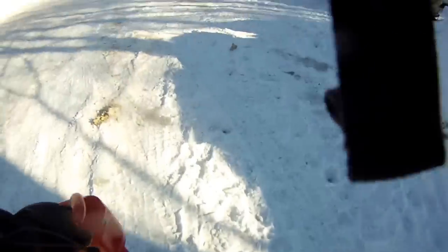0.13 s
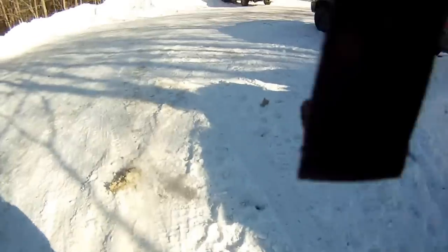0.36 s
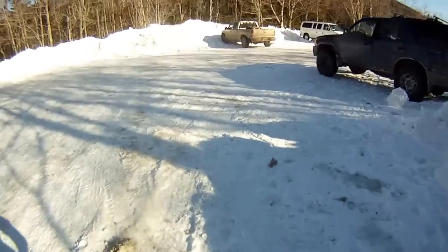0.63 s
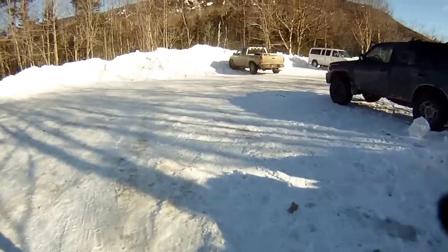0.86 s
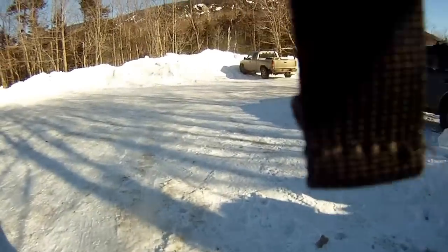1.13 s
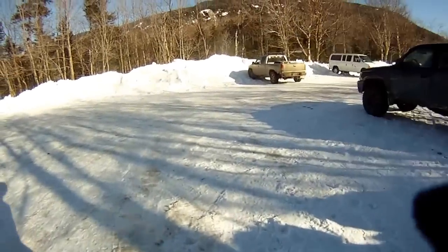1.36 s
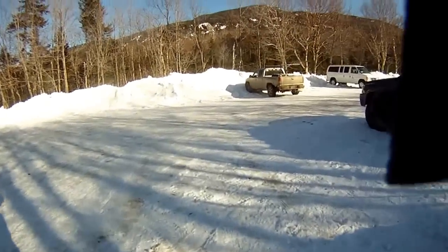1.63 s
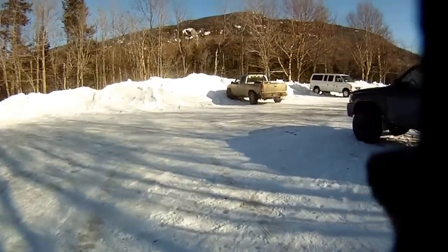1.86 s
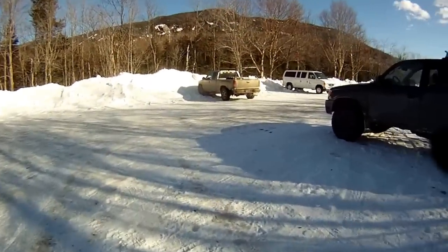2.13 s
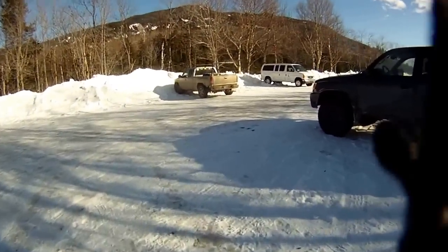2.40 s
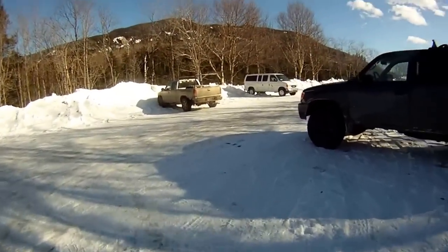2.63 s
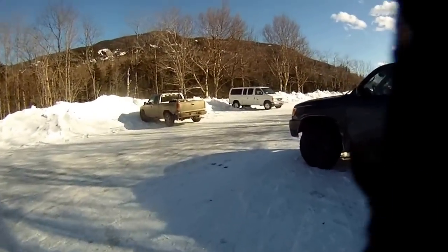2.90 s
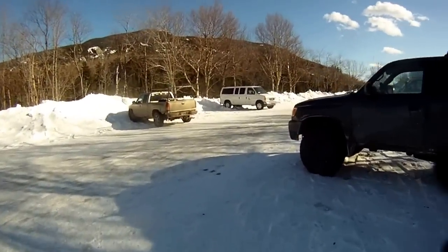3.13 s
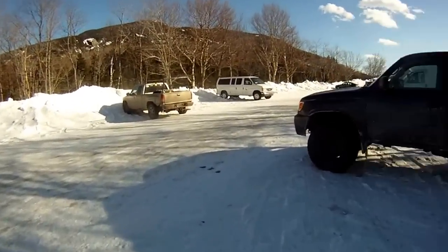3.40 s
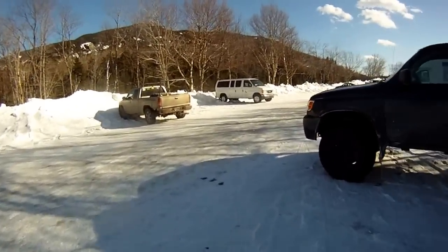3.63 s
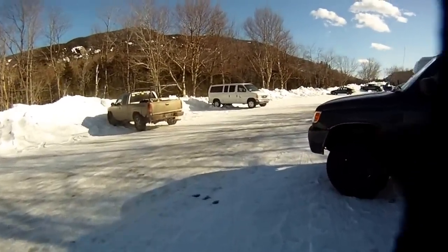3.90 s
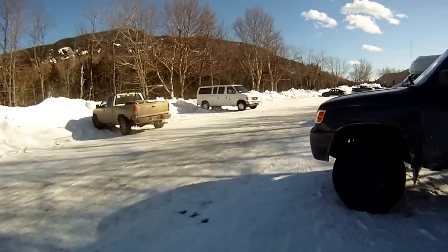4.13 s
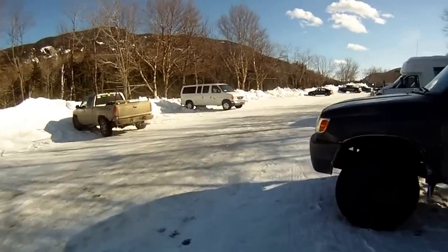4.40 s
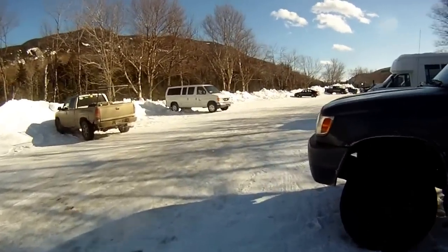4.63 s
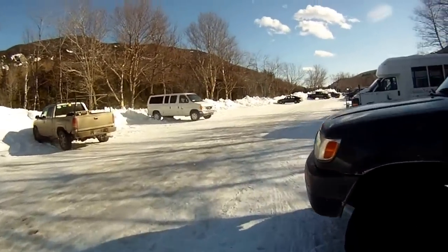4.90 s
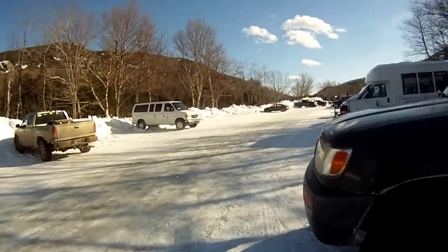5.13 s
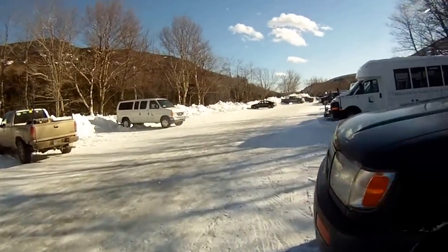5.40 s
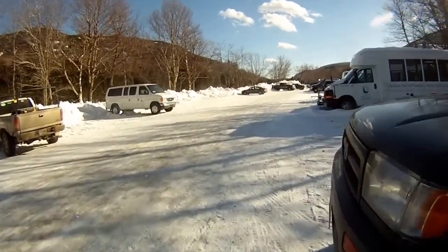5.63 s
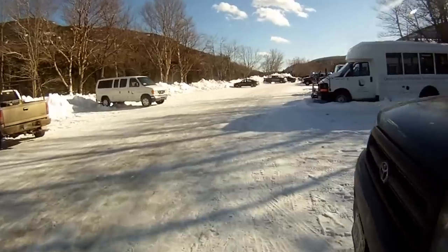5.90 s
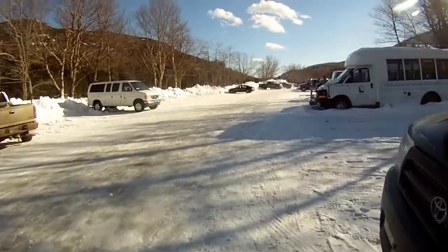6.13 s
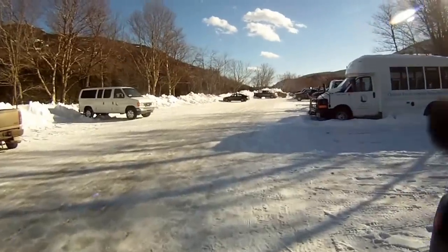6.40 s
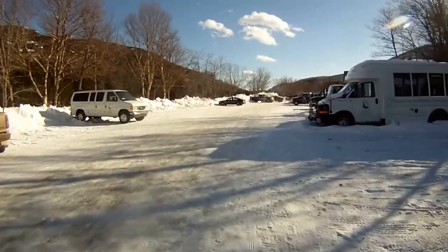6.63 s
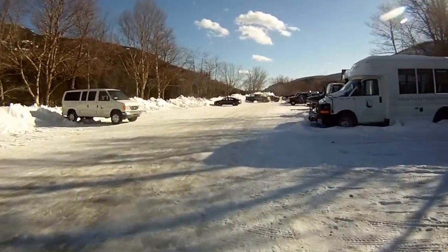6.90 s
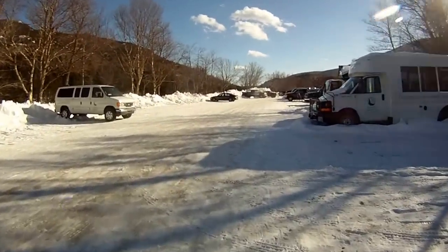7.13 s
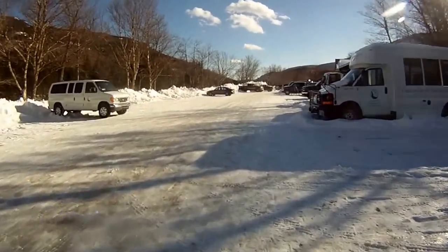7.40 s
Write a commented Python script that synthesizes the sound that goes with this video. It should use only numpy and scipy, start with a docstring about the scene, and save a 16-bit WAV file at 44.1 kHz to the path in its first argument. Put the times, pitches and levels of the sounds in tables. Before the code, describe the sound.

From 0 to 0.75 seconds, muffled boots crunch and drag over packed icy snow, with a nasal rubbing hum on a sealed plastic camera case and a soft low gust. Around 0.8 to 1.2 light thuds and dry ticks begin, with a stronger crunch at 1.0. A short rattle at 1.3 leads to a deep thump at 1.43, then a very loud hollow clack at 1.82. From 2 seconds knocks come thick and uneven, many with a tiny bounce, mixed with brief gritty mount rattles. Strong clacks stand out near 2.2, 3.1, 3.25, 3.87, 5.2 and 6.26; the 5.2 cluster is especially sharp. Crunching steps swell between and under them, notably at 3.5, 5.1, 5.6 and 7.3. Low wind heaves come and go, strongest near 1.6 to 2.1 and 4.3. Faint hiss and coarse, metallic treble persist until the cut at 7.5, without echo.

```python
"""Someone walks over packed icy snow with a small camera in a closed plastic housing.
From the start boots crunch (clumped, filtered clicks), the shell hums with rubbing, and gusts heave (slow noise).
From 0.8 s knocks ring the shell (damped sines, noise snaps); from 1.3 s the mount rattles and grinds in short runs.
Knocks, rattles, steps and gusts go on to the end at 7.5 s, over faint hiss.
Throughout, the sound is sampled at a low rate and each sample held, which mirrors the spectrum into the treble."""
import sys
import numpy as np
from scipy import signal
from scipy.fft import rfft, irfft, next_fast_len
from scipy.io import wavfile
from scipy.ndimage import uniform_filter1d

SR = 44100
rng = np.random.default_rng(int(sys.argv[2]) if len(sys.argv) > 2 else 0)


def voltage_ratio(level):
    """Linear amplitude factor for a level in decibels (scalar or array-like)."""
    return 10 ** (np.asarray(level, float) / 20)


def store_wav(level_fs):
    """Save 16-bit WAV to argv[1]."""
    pcm = np.round(np.clip(np.atleast_2d(level_fs), -1, 1) * 32767)
    wavfile.write(sys.argv[1], SR, pcm.T.astype(np.int16))


N = 331543

# Single knocks on the shell. Each row: time in seconds, then thud, body and sharp drive in dB.
KNOCKS = [(0.7766, -14.5, -22, -29.5), (0.8897, -22, -31.5, -37), (0.935, -28.5, -44, -56),
          (0.955, -52, -45, -27), (1.048, -55, -34, -31.5), (1.1457, -57, -40.5, -22.5),
          (1.43, -4.5, -21, -29.5), (1.4358, -40, -30, -18.5), (1.4524, -22, -27, -31),
          (1.5422, -32, -28, -22.5), (1.5764, -44, -40, -24), (1.596, -58, -42, -22.5),
          (1.691, -49, -42, -21.5), (1.8197, -20, 1, -6.5), (1.9138, -25, -15, -30.5),
          (2.045, -25, -44, -22), (2.056, -31, -11.5, -30), (2.0696, -15, -15, -33),
          (2.0745, -41, -21, -14.5), (2.1151, -51, -52, -25), (2.1842, -19.5, -5.5, -18.5),
          (2.2411, -29, -22.5, -34), (2.25, -36, -15, -24), (2.273, -48, -39, -21.5),
          (2.5237, -30, -11.5, -15.5), (2.634, -21, -21.5, -34.5), (2.788, -39, -60, -22),
          (2.7989, -11.5, -21, -10.5), (2.8906, -14.5, -18, -34), (2.9033, -17.5, -40, -27),
          (3.0655, -28, -4.5, -22), (3.0745, -17, -17, -23), (3.0854, -17, -53, -18),
          (3.0957, -18, -12, -33), (3.1246, -23, -20, -18), (3.2385, -17, -5.5, -17),
          (3.273, -35, -22.5, -27.5), (3.3588, -61, -44, -19.5), (3.5811, -13, -10, -22),
          (3.5858, -18, -21.5, -42), (3.6234, -26.5, -38, -38), (3.7735, -35, -41, -23),
          (3.8687, -15, -1.5, -22), (3.875, -14, -14, -35), (3.88, -24, -17, -26), (3.9088, -36, -27, -42),
          (4.084, -39, -11.5, -26.5), (4.1371, -21, -19.5, -44), (4.1457, -23, -18.5, -29),
          (4.2866, -38, -39, -19.5), (4.362, -33, -9.5, -28), (4.3673, -21, -16.5, -25),
          (4.4022, -56, -46, -28), (4.4917, -24, -26, -31), (4.507, -24.5, -36, -37),
          (4.7853, -29.5, -40, -28), (4.827, -54, -37.5, -29.5), (4.9214, -15.5, -41, -15),
          (4.9849, -35, -11.5, -16), (5.018, -24, -30, -24.5), (5.2202, -14, -1.5, -19),
          (5.2252, -21, -11.5, -6.5), (5.243, -26, -20.5, -19), (5.268, -21, -14.5, -42),
          (5.2854, -15.5, -30, -33), (5.3774, -15.5, -24.5, -22), (5.389, -29, -19.5, -32),
          (5.4452, -29, -8.5, -13.5), (5.4491, -21, -38, -28), (5.4931, -56, -46, -21),
          (5.5642, -21, -43, -21), (5.569, -18, -28, -22), (5.722, -44.5, -24, -25.5),
          (5.7412, -21, -12.5, -17), (5.8693, -27, -19, -40.5), (5.898, -49, -48, -25),
          (5.9546, -25, -40, -28.5), (5.969, -37, -54, -27), (6.0168, -39, -40, -28.5),
          (6.086, -16.5, -26, -25), (6.1067, -37, -36, -23), (6.2597, -20, -6.5, -18),
          (6.4906, -23, -19, -29), (6.5687, -44, -16.5, -25), (6.5936, -57, -51, -23),
          (6.7994, -12.5, -10, -27), (6.8322, -44, -24, -24), (6.94, -23.5, -14.5, -29),
          (7.033, -62, -57, -25), (7.0858, -19, -38, -35), (7.137, -55, -40, -20.5),
          (7.1504, -23, -16.5, -36.5), (7.3983, -27, -25.5, -35)]
# Shell modes: a broad push moves the low ones, a hard edge the high ones.
# Each row: frequency in Hz, level against the drive in dB, t60 in seconds.
THUD_MODES = [(133.4, -12.5, 0.018), (253, -6, 0.0081), (422, -8, 0.0094), (695, 0.5, 0.0041)]
BODY_MODES = [(908, -9, 0.0081), (1202, -2.5, 0.011), (1671, -6, 0.012)]
SHARP_MODES = [(2100, 1, 0.019), (3551, -5, 0.02), (4040, -24, 0.0046), (4660, -22, 0.028)]
# Spectrum of snaps, chatter and scraping. Each row: frequency in Hz, relative density in dB per Hz.
SNAP_COLOUR = [(900, -63), (1400, -16), (1750, 6), (2200, 11), (2900, -2.5), (3800, 1), (5900, -12.5)]
# Camera shaking in its mount, a run of small blows.
# Each row: start in seconds, length in seconds, then thud, body and sharp drive in dB.
RATTLES = [(1.277, .07, -63, -48, -43), (1.994, .045, -29.5, -33, -31), (2.268, .045, -30.5, -36.5, -39),
           (2.59, .085, -32.5, -45, -35), (3.104, .055, -27, -53, -29.5), (4.089, .04, -19.5, -26.5, -41),
           (4.155, 0.13, -39, -54, -32.5), (4.618, .06, -26.5, -27, -34), (4.99, .015, -22.5, -30, -32),
           (5.31, .05, -45, -50, -30), (5.252, .06, -24.5, -39, -24), (5.702, .012, -25, -48, -38),
           (5.754, 0.038, -22.5, -23, -28.5), (5.855, .02, -25, -42, -32), (6.268, .1, -26.5, -49, -30),
           (6.466, .02, -25, -34.5, -36), (6.819, .045, -27, -29, -35), (6.933, .075, -32, -34, -29.5),
           (7.052, .03, -60, -56, -33), (7.32, .02, -34, -38, -51), (7.41, .015, -45, -33, -31)]
# Boots pressing and dragging through the crust. Each row: loudest time in seconds, swell in seconds,
# fade in seconds, snow crunch in dB, rubbing on the shell in dB.
SCUFFS = [(.1, .15, 0.14, -50, -52.5), (.36, 0.2, 0.3, -47, -49.5), (.56, 0.014, 0.024, -49, -48.5),
          (.78, 0.16, 0.036, -47.5, -66), (1.0, 0.16, 0.05, -40, -48), (1.3, 0.16, 0.13, -48.5, -60),
          (1.41, 0.06, 0.17, -56, -48.5), (1.55, 0.066, 0.088, -42.5, -49), (1.88, 0.15, .2, -43.5, -48),
          (2.1, 0.18, 0.065, -47.5, -47.5), (2.27, 0.036, 0.06, -52, -54), (2.38, 0.06, 0.099, -46.5, -51),
          (2.62, 0.14, 0.14, -48, -53), (3.0, 0.081, 0.085, -51.5, -50), (3.14, 0.013, 0.054, -42, -55),
          (3.25, 0.044, 0.063, -51.5, -49.5), (3.38, 0.021, 0.064, -55, -62),
          (3.471, 0.038, 0.055, -40.5, -54), (3.75, 0.11, 0.078, -41.5, -46), (4.0, 0.12, 0.22, -51, -53.5),
          (4.22, 0.16, 0.18, -48, -52.5), (4.55, 0.067, 0.07, -46, -53), (4.809, 0.08, 0.042, -47.5, -48.5),
          (4.97, 0.1, 0.18, -53, -54), (5.121, 0.041, 0.062, -40, -45.5), (5.32, 0.048, 0.11, -40, -47),
          (5.63, .11, 0.14, -40.5, -47), (5.88, 0.043, 0.035, -43.5, -48.5),
          (6.08, 0.15, 0.094, -51.5, -58), (6.2, 0.044, .08, -53, -53.5), (6.41, 0.15, 0.068, -47, -49.5),
          (6.56, .03, 0.037, -58, -58), (6.7, 0.047, 0.064, -44, -53.5), (6.97, .05, 0.048, -47, -53),
          (7.1, 0.061, 0.12, -54, -63), (7.279, 0.068, 0.084, -40, -49), (7.52, 0.066, 0.028, -46, -44.5)]
# Muffled snow spectrum. Each row: frequency in Hz, relative density in dB per Hz.
CRUNCH_COLOUR = [(180, -4), (300, -4), (441, -30), (488, -61), (588, -12.5), (956, -5), (1230, -4),
                 (1440, -2.5), (2290, 7.5), (2900, -3.5), (3700, -8.5), (4200, -17), (5900, -26),
                 (7670, -71), (13000, -120)]
# Shell hum under rubbing. Each row: frequency in Hz, width in Hz, relative level in dB.
RUB_MODES = [(1304, 89, -2.5), (780, 180, -17), (3460, 120, -14.5)]
# Gusts pressing on the shell. Each row: strongest time in seconds, heave level in dB.
GUSTS = [(.33, -47), (.8, -50.5), (1.04, -49.5), (1.63, -39.5), (2.12, -39), (2.62, -44.5), (3.17, -49),
         (3.49, -49), (3.92, -41.5), (4.29, -39), (4.83, -43.5), (5.36, -43.5), (5.78, -45.5), (6.55, -56),
         (6.98, -43), (7.15, -46), (7.5, -40.5)]
# Spectrum of the wind flutter. Each row: frequency in Hz, gain in dB.
WIND_COLOUR = [(35, -4.5), (60, 0), (141, -3), (172, -4), (450, -26), (580, -20), (990, -120)]

BOUNCE_S, BOUNCE_DB = 0.0055, (-8.5, -13, -26.5)  # typical delay; thud, body, sharp against the knock
RATTLE_GAP_S, RATTLE_UNEVEN, RATTLE_SCATTER_DB = 0.013, 0.35, 4  # typical gap, its log spread, drive spread
SCRAPE_DB, SCRAPE_FADE_S = -21.5, 0.015  # dB against the sharp column of a rattle
QUIET_CRUNCH_DB, QUIET_RUB_DB = -58, -61  # between the steps
GUST_SWELL_S, GUST_FADE_S, CALM_DB = 0.088, 0.078, -58
FLUTTER_DB, HISS_DB = -56.5, -65.5  # rms
HELD_RATE_HZ, PLAY_RATE_HZ, TOP_HZ = 12000, 48000, 15250


def level(x, db):
    """Scale to an rms level."""
    return x * voltage_ratio(db) / np.sqrt(np.mean(x ** 2))


def colour(x, points):
    """Shape a spectrum by (Hz, dB) points, straight lines over log frequency."""
    hz, db = np.transpose(points)
    size = next_fast_len(N)
    bins_hz = np.maximum(np.arange(size // 2 + 1) * SR / size, 1)
    gain = voltage_ratio(np.interp(np.log(bins_hz), np.log(hz), db))
    return irfft(rfft(x, size) * gain, size)[:N]


def ring(x, hz, t60_s):
    """One damped mode; a unit blow starts a sine of size one."""
    pole = np.exp(2j * np.pi * hz / SR - np.log(1000) / (t60_s * SR))
    return signal.lfilter([1], [1, -pole], x).imag


def walk(rate_hz):
    """Random levels held 1 / rate_hz seconds and slewed twice; spread one."""
    hold = int(SR / rate_hz)
    steps = np.repeat(rng.standard_normal(N // hold + 1), hold)
    x = uniform_filter1d(uniform_filter1d(steps, hold), hold)[:N]
    return x / x.std()


def grains(per_s, spread_db):
    """Random clicks, many small and a few large."""
    hit = rng.random(N) < per_s / SR
    size_db = spread_db * rng.exponential(size=N)
    return hit * rng.standard_normal(N) * voltage_ratio(size_db)


def swells(at_s, swell_s, fade_s, peak_db, quiet_db):
    """Level in dB of bell-shaped swells over a quiet bed, added as power."""
    coarse = np.arange(0, N, 64)
    late_s = coarse / SR - at_s[:, None]
    width_s = np.where(late_s.T < 0, swell_s, fade_s).T
    bells = np.exp(-2 * (late_s / width_s) ** 2)
    power = voltage_ratio(2 * peak_db) @ bells + voltage_ratio(2 * quiet_db)
    return np.interp(np.arange(N), coarse, 10 * np.log10(power))


def knocks(scatter_db=3.0, contact_turns=0.26, snap_db=-5.5, snap_s=0.0019, chatter_db=-26.0, chatter_s=0.011):
    """Every blow pushes the shell inward and rings all modes, each spot a little differently."""
    at_s, thud_db, body_db, sharp_db = blows().T
    spot = rng.standard_normal((len(at_s), 2, 11))  # blow, (level, detune), mode
    t = np.arange(2048) / SR
    # the high modes need a solid blow; a light sharp touch is only a dry snap
    ring_db = np.minimum(sharp_db, body_db)
    groups = zip((thud_db, body_db, ring_db), (THUD_MODES, BODY_MODES, SHARP_MODES))
    modes = [(mode, drive_db) for drive_db, table in groups for mode in table]
    rings = 0
    for k, ((hz, db, t60_s), drive_db) in enumerate(modes):
        size = voltage_ratio(drive_db + db + scatter_db * spot[:, 0, k])[:, None]
        mode_hz = hz * (1 + 0.012 * spot[:, 1, k])[:, None]
        rise = 1 - np.exp(-t * hz / contact_turns)  # the contact builds up, slower for the low modes
        decay = np.exp(-np.log(1000) * t / t60_s)
        rings = rings - size * rise * np.sin(2 * np.pi * mode_hz * t) * decay

    at = np.minimum((at_s * SR).astype(int)[:, None] + np.arange(len(t)), N - 1)
    sharp = voltage_ratio(sharp_db)[:, None]
    grit = level(colour(rng.standard_normal(N), SNAP_COLOUR), snap_db)
    snaps = sharp * grit[at] * np.exp(-t / snap_s)
    loose = level(colour(grains(750, 4.5), SNAP_COLOUR), chatter_db)
    chatter = sharp * loose[at] * np.exp(-t / chatter_s)  # the loose mount chatters on for a moment
    shell = np.bincount(at.ravel(), (rings + snaps + chatter).ravel(), N)
    high_pass = signal.butter(2, 110, "high", fs=SR, output="sos")  # a small shell moves no deep bass
    return signal.sosfilt(high_pass, shell)


def blows():
    """Knocks, the quick bounce that follows each, and the rattles."""
    late_s = BOUNCE_S * np.exp(0.22 * rng.standard_normal(len(KNOCKS)))
    bounces = np.array(KNOCKS) + np.column_stack([late_s, np.tile(BOUNCE_DB, (len(late_s), 1))])
    return np.vstack([KNOCKS, bounces, rattles()])


def rattles():
    """Rows of small blows at uneven gaps, each landing on another spot."""
    start_s, length_s, *drives_db = np.transpose(RATTLES)
    chance = rng.standard_normal((len(start_s), 12, 4))
    gaps_s = RATTLE_GAP_S * np.exp(RATTLE_UNEVEN * chance[..., 0])
    late_s = np.cumsum(gaps_s, axis=1) - gaps_s[:, :1]
    blows_db = np.transpose(drives_db)[:, None] + RATTLE_SCATTER_DB * chance[..., 1:]
    stopped = late_s > length_s[:, None]
    blows_db -= 200 * stopped[..., None]  # silent once the shaking stops
    return np.dstack([start_s[:, None] + late_s, blows_db]).reshape(-1, 4)


def scraping():
    """While the camera shakes, the mount grinds with fine dry grains."""
    start_s, length_s, *_, sharp_db = np.transpose(RATTLES)
    half_s = length_s / 2 + SCRAPE_FADE_S
    uneven = grains(1500, 2.1) * voltage_ratio(4.0 * walk(90))
    grind = level(colour(uneven, SNAP_COLOUR), SCRAPE_DB)
    return grind * voltage_ratio(swells(start_s + length_s / 2, 1.23 * half_s, 1.9 * half_s, sharp_db, -90))


def crunch(db):
    """Ice crystals break by the thousand, in uneven clumps."""
    breaking = level(grains(3700, 2.8), -2) + level(rng.standard_normal(N), 1.5)
    clumps = breaking * voltage_ratio(2.5 * walk(40))
    return level(colour(clumps, CRUNCH_COLOUR), 0) * voltage_ratio(db)


def rubbing(db):
    """Cloth and strap slide on the shell and make it hum."""
    slips = level(grains(2500, 1.3), 0) * voltage_ratio(0.72 * walk(20))
    hum = 0
    for hz, width_hz, mode_db in RUB_MODES:
        t60_s = np.log(1000) / (np.pi * width_hz)
        hum = hum + level(ring(slips, hz, t60_s), mode_db)
    return hum * voltage_ratio(db)


def wind(heave_db):
    """Gusts press slowly on the shell, and small eddies flutter above that."""
    band = signal.butter(2, [12, 38], "band", fs=SR, output="sos")
    heave = signal.sosfilt(band, rng.standard_normal(N))
    flutter = colour(rng.standard_normal(N) * voltage_ratio(0.99 * walk(20)), WIND_COLOUR)
    flutter = flutter * voltage_ratio(0.065 * heave_db)  # follows the gusts only slightly
    return level(heave, 0) * voltage_ratio(heave_db) + level(flutter, FLUTTER_DB)


def scene():
    """All of it as it reaches the microphone inside the housing."""
    at_s, swell_s, fade_s, crunch_db, rub_db = np.transpose(SCUFFS)
    snow = crunch(swells(at_s, swell_s, fade_s, crunch_db, QUIET_CRUNCH_DB))
    hum = rubbing(swells(at_s, swell_s, fade_s, rub_db, QUIET_RUB_DB))
    gust_s, gust_db = np.transpose(GUSTS)
    gusts = wind(swells(gust_s, GUST_SWELL_S, GUST_FADE_S, gust_db, CALM_DB))
    return (knocks() + scraping() + snow + hum + gusts)[None]


def top_cut(x):
    """Nothing passes above the cut-off."""
    return signal.sosfilt(signal.butter(12, 16530, fs=SR, output="sos"), x)


def record(dry):
    """Sampled slowly, each value held for four faster samples, so images of the sound flank the slow rate."""
    hiss = level(rng.standard_normal(N), HISS_DB)
    loud = np.tanh(dry + hiss)  # big blows overload
    slow = signal.resample_poly(loud, HELD_RATE_HZ, SR, axis=1)
    held = np.repeat(slow, PLAY_RATE_HZ // HELD_RATE_HZ, axis=1)
    played = signal.resample_poly(held, SR, PLAY_RATE_HZ, axis=1)[:, :N]
    low_pass = signal.ellip(9, 0.5, 45, TOP_HZ, fs=SR, output="sos")
    mix = signal.sosfilt(low_pass, played)
    return top_cut(mix)


dry = scene()
out = record(dry)
store_wav(out)
```